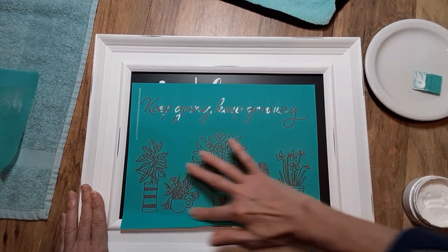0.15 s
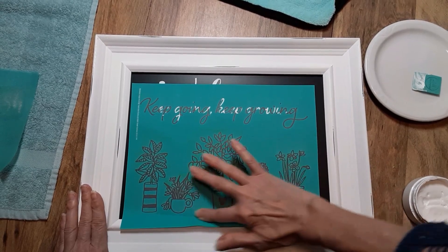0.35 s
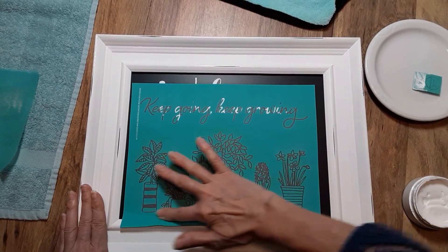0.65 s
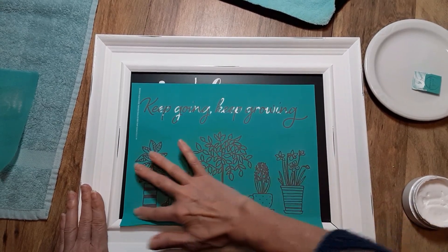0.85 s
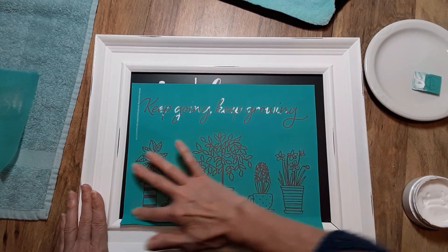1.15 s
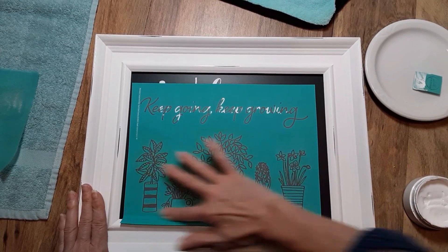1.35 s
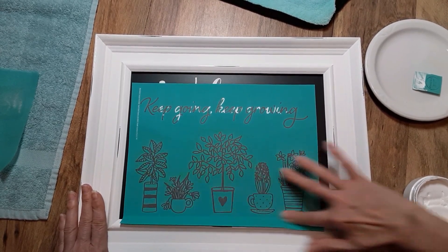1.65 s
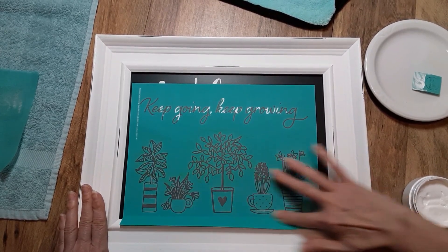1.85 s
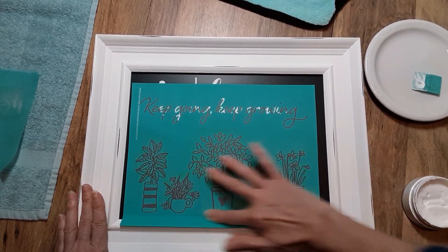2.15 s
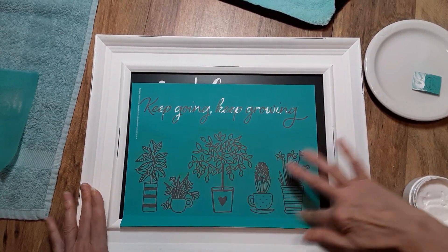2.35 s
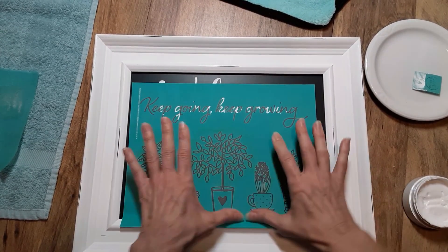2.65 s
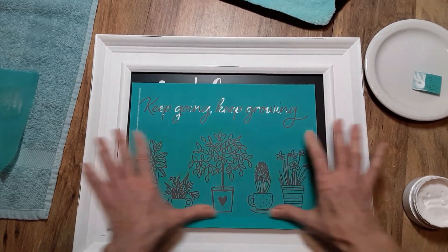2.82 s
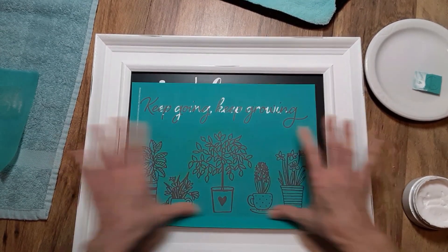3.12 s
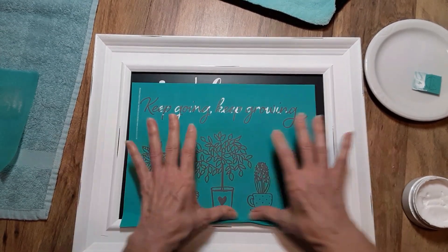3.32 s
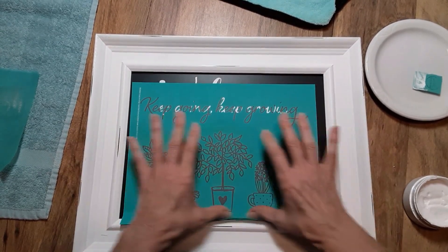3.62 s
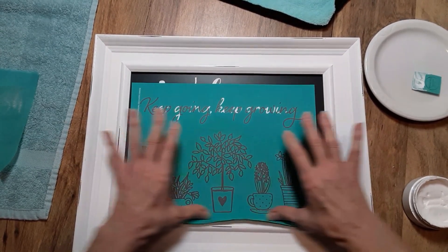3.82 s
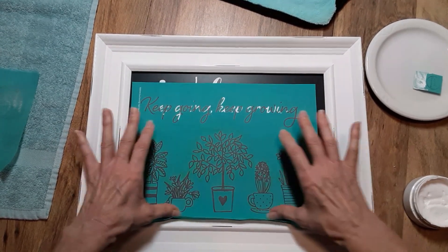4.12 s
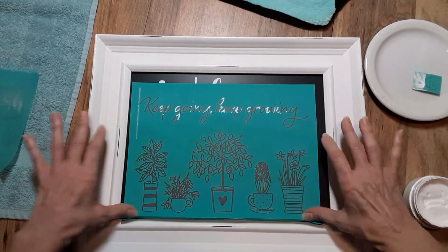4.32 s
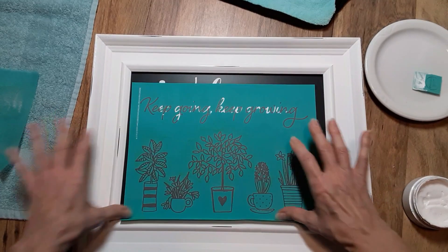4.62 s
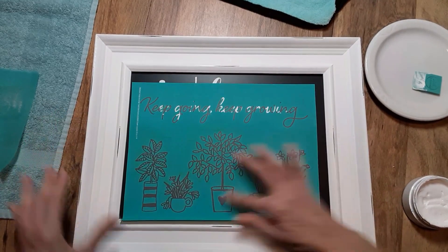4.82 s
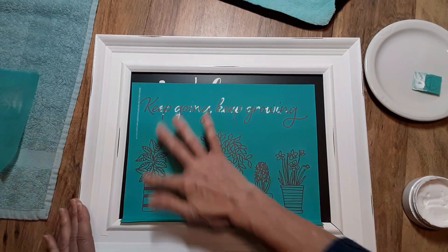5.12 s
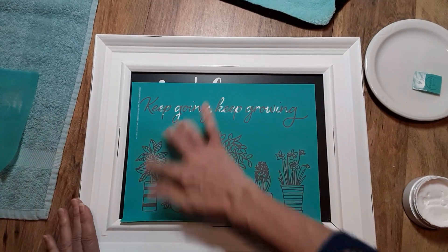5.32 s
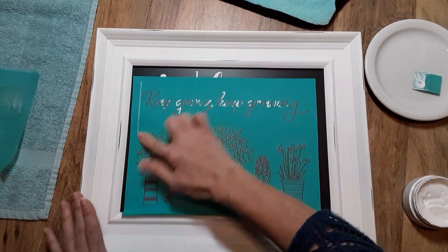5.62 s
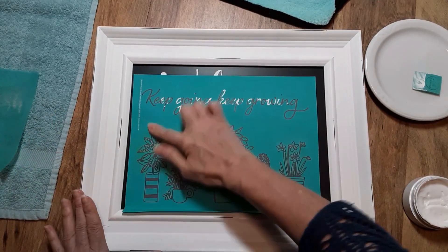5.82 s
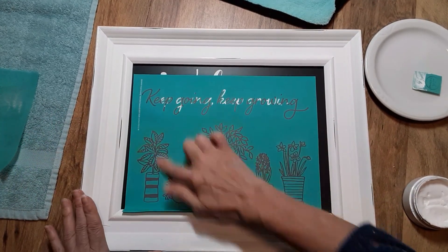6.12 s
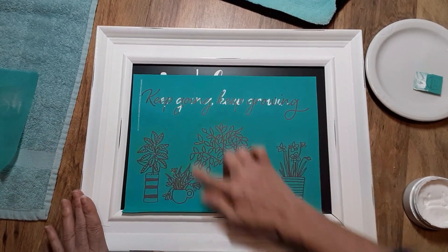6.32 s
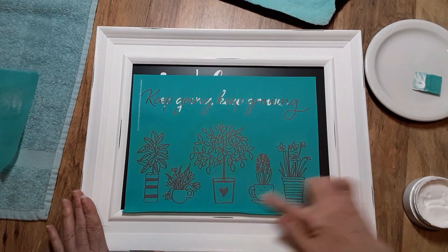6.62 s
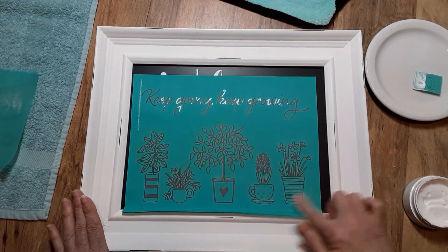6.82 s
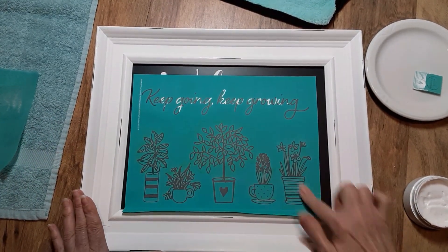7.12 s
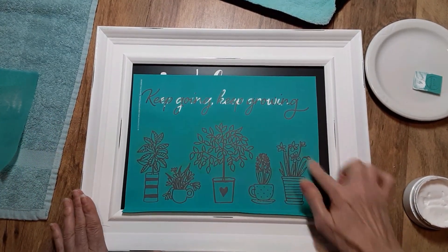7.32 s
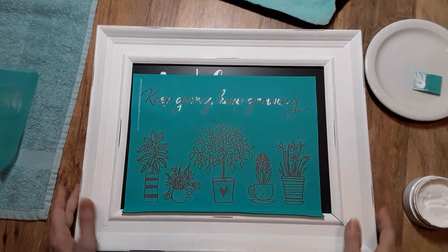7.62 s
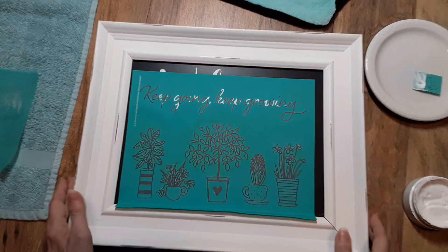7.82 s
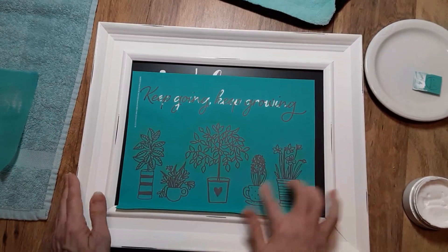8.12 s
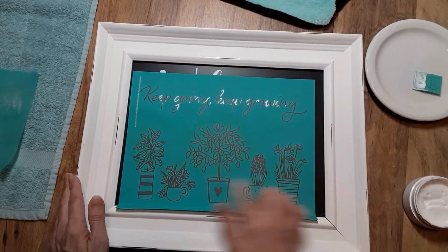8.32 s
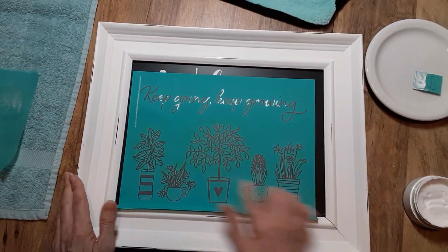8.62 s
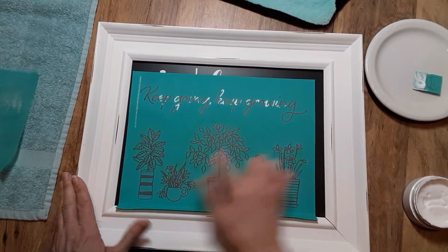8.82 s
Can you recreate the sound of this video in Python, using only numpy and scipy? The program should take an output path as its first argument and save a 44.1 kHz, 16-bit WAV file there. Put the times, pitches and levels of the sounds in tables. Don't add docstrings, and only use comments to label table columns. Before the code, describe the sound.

Dry palm swipes, then quick finger scrubs over film on a hollow board, with thuds and a loud snap in a quiet room.

```python
import sys
import numpy as np
from scipy import signal
from scipy.io import wavfile
from scipy.ndimage import uniform_filter1d

SR = 44100
rng = np.random.default_rng(int(sys.argv[2]) if len(sys.argv) > 2 else 0)


def boost(x):
    u = np.asarray(x, float) / 20
    return 10 ** u


def master(y):
    cut = np.clip(np.atleast_2d(y).T, -1, 1)
    pcm = np.round(cut * 32767)
    wavfile.write(sys.argv[1], SR, pcm.astype(np.int16))


N = 395119

# pitch_hz, width_hz, rubbed_db, knocked_db
BOARD_MODES = [(97.5, 74, -9, -17.5), (167, 13.5, 7.5, -12), (272, 20, -2.5, -6.5), (307, 60, 0.5, -1),
               (412, 56, 2, 6), (481, 93, -4, 6.5), (550, 88, -7, -3), (616.4, 61, -3, -2.5),
               (760, 29.6, -3.5, -7), (818, 17, 1.5, -25), (929, 43, -4, -10), (1061, 49, -1.5, -10)]
# pitch_hz, width_hz, level_db
EDGE_MODES = [(1108, 250, -3.5), (1319, 128, -6), (1658, 87, -3.5), (1800, 110, 0), (2076, 120, -7),
              (2550, 250, -12.5)]
# time_s, edge_above_hiss_db, dullness_db, slip_pitch_hz
HAND_GRIP = [(0, -9.5, 6.5, 624), (.7, -9, 5, 556), (1.2, -6, 5.5, 616), (1.6, -2.5, 4.5, 780),
             (2.0, -10, 6.5, 630), (2.4, -6, 6, 670), (2.8, -9, 8, 669), (3.3, -10, 7.5, 776),
             (3.9, -5, 6.5, 734), (4.6, -9, 6.5, 573), (4.8, -35, 10, 434), (5.1, -5, 3.5, 506),
             (5.6, 1, 9.5, 486), (6.3, -2, 4, 550), (6.9, 4.5, 7, 464), (7.2, -4.5, 1, 606),
             (8.2, -7, 6, 515), (8.96, 3, 5, 594)]


def evened(x):
    return x / np.sqrt(np.mean(x ** 2) + 1e-20)


def read(points, hz):
    f, value = np.transpose(points)
    return np.interp(np.log(hz + 1), np.log(f + 1), value)


def curve(table, t):
    s, *columns = np.transpose(table)
    return [np.interp(t, s, column) for column in columns]


def ring(x, hz, width):
    pole = np.exp((2j * np.pi * hz - np.pi * width) / SR)
    return 2 * signal.lfilter([1 - abs(pole)], [1, -pole], x).real


def drift(samples):
    smooth = uniform_filter1d(rng.standard_normal(N), samples)
    return evened(uniform_filter1d(smooth, samples))


def shaped(x, rule, size=256):
    overlap = size * 3 // 4
    hz, s, z = signal.stft(x, SR, nperseg=size, noverlap=overlap)
    y = signal.istft(rule(z, hz[:, None], s), SR, nperseg=size, noverlap=overlap)[1]
    return y[..., :x.shape[-1]]


def blend(z, hz):
    # pitch_hz, likeness_0_to_1
    likeness = [(30, 0.65), (130, 0.89), (300, 0.81), (640, 0.64), (1400, 0.028), (3000, 0.07)]
    same = np.clip(read(likeness, hz), 0, 1)
    return np.array([z[0], same * z[0] + np.sqrt(1 - same ** 2) * z[1]])


def air():
    # pitch_hz, level_db per Hz
    hush_colour = [(15, -60), (25, -50), (64, -13), (97, -29), (105, -14), (145, -6), (242, -13.5),
                   (335, -5), (394, -15.5), (476, -8.5), (531, -15.5), (962, -17.5), (1160, -20),
                   (1560, -35), (16000, -43.5)]
    # pitch_hz, waver_hz, level_db
    drone_tones = [(118.8, 0.42, -64), (154, 3.4, -63.5), (271.7, 12, -71.5)]

    def colour(z, hz, s):
        return blend(z, hz) * boost(read(hush_colour, hz))

    hush = shaped(rng.standard_normal((2, N)), colour, size=2048)
    t = np.arange(N) / SR
    drone = np.zeros(N)
    for hz, waver_hz, db in drone_tones:
        waver = waver_hz * np.cumsum(drift(7650)) / SR
        drone += boost(db) * np.sin(2 * np.pi * (hz * t + waver))
    return boost(-58.5) * evened(hush) + drone


def strokes(t):
    # start_s, length_s, hiss_db, top_speed_place_0_to_1, board_load_db; the faint one at 7.63 s is
    palm_strokes = [(0.0, .24, -49.5, 0.6, -46.5), (0.21, 0.16, -59, 0.64, -62.5),
                    (0.365, 0.24, -48.5, 0.51, -46), (0.604, 0.13, -56.5, 0.53, -63.5),
                    (0.734, 0.17, -52, 0.61, -49.5), (0.927, 0.15, -55.5, 0.46, -62),
                    (1.069, 0.17, -54.5, 0.56, -51), (1.243, 0.5, -48, 0.25, -59),
                    (1.446, 0.36, -48, 0.36, -56), (1.751, 0.38, -45.5, 0.59, -49.5),
                    (2.098, 0.24, -48.5, 0.58, -55.5), (2.245, 0.16, -45, 0.58, -63)]
    two_hand_strokes = [(2.67, 0.42, -49.5, 0.45, -47.0), (3.028, 0.34, -44, 0.45, -46),
                        (3.286, 0.23, -53, 0.48, -49.5), (3.5, 0.24, -51.5, 0.45, -44.5),
                        (3.685, 0.38, -53.5, 0.48, -49.5), (3.997, 0.14, -58.5, 0.56, -50.5),
                        (4.132, 0.24, -52, 0.57, -48), (4.35, 0.24, -60.5, 0.67, -52.5),
                        (4.568, 0.16, -62.5, 0.2, -58.5)]
    finger_strokes = [(4.766, 0.077, -41, 0.51, -55.5), (4.806, 0.23, -48, 0.67, -51.5),
                      (5.032, 0.16, -52, 0.56, -53.0), (5.213, 0.066, -55.5, 0.26, -59.0),
                      (5.292, 0.12, -50.5, 0.37, -59.5), (5.417, 0.087, -50.5, 0.43, -62.5),
                      (5.514, 0.15, -55, 0.34, -59), (5.649, 0.077, -52, 0.34, -59.5),
                      (5.753, 0.096, -52.5, 0.23, -58.5), (5.857, 0.082, -49.5, 0.6, -58.5),
                      (5.965, 0.095, -51.5, 0.36, -57.5), (6.066, 0.1, -51, 0.57, -57.5),
                      (6.174, 0.11, -53, 0.47, -56.5), (6.259, 0.16, -52.5, 0.57, -61.5),
                      (7.63, 0.21, -80, 0.47, -74), (6.374, 0.189, -58, 0.29, -57),
                    (6.464, 0.34, -55, 0.48, -64), (6.819, 0.1, -56, 0.24, -75),
                    (6.894, 0.15, -56.5, 0.6, -71), (7.023, 0.25, -57.5, 0.8, -54.0),
                    (7.248, 0.17, -69, 0.53, -62), (7.442, 0.053, -74.5, 0.08, -62),
                    (8.123, 0.11, -56, 0.54, -62), (8.249, 0.19, -49.5, 0.4, -60),
                    (8.434, 0.14, -55, 0.57, -58.5), (8.596, 0.2, -50.5, 0.43, -57.5),
                    (8.794, 0.14, -49.5, 0.17, -55.5), (8.88, 0.17, -55, 1, -49.5)]
    speed_bend, load_bend = 2.055, 0.92
    catch, catch_s, catch_db = 0.14, 0.0066, -11.5
    hiss = boost(2 * -97) + 0 * t
    load = hiss.copy()
    press, total = 0 * t, 1e-6 + 0 * t
    for s, length, hiss_db, top, load_db in palm_strokes + two_hand_strokes + finger_strokes:
        top = np.clip(top, .03, .97)
        speed = np.sin(np.pi / 2 * np.interp(t, [s, s + top * length, s + length], [0, 1, 0]))
        light_db = catch_db * np.clip((s + catch * length - t) / catch_s, 0, 1)
        hiss = hiss + (boost(hiss_db) * speed ** speed_bend) ** 2
        load = load + (boost(load_db + light_db) * speed ** load_bend) ** 2
        press = press + speed * (load_db - hiss_db)
        total = total + speed
    return 10 * np.log10(hiss), 10 * np.log10(load), press / total


def controls():
    t, coarse = np.arange(N) / SR, np.arange(0, N + 128, 64) / SR
    hiss_db, load_db, press_db = (np.interp(t, coarse, c) for c in strokes(coarse))
    edge_db, _, slip_hz = curve(HAND_GRIP, t)
    return hiss_db, load_db, hiss_db + edge_db + 0.58 * press_db, slip_hz


def slips(grain_db, judder_db):
    grain = np.minimum(rng.exponential(1, N), 5)
    size = boost(grain_db * grain + judder_db * drift(140))
    return evened(size * rng.standard_normal(N))


def skin_hiss():
    # pitch_hz, level_db per Hz
    skin_colour = [(710, -26.5), (1200, -13), (1620, -11.5), (1910, -8.5), (2470, -13.5), (2690, -12.5),
                   (3230, -9), (4910, -7.5), (5710, -6), (12300, 4), (15700, -0.5)]
    # pitch_hz, share_of_dullness
    dull_tilt = [(1000, 1), (4000, 0.63), (7000, 0.57), (10000, -0.22), (16000, -1)]
    speed = boost(controls()[0])
    patches = uniform_filter1d(rng.standard_normal((129, N // 64 + 9)), size=6, axis=0)
    patches = evened(uniform_filter1d(patches, size=40, axis=1))

    def colour(z, hz, s):
        hiss_db, _, press_db = strokes(s)
        dull_db = curve(HAND_GRIP, s)[1] + 0.28 * press_db - 0.13 * np.maximum(hiss_db + 49.5, -12)
        return z * boost(read(skin_colour, hz) + read(dull_tilt, hz) * dull_db + 2.0 * patches[:, :len(s)])

    def treble(z, hz, s):
        return z * boost(read(skin_colour, hz)) * (hz > 5000)

    unit = np.std(shaped(rng.standard_normal(SR), treble))
    contacts = []
    for _ in range(3):
        contacts.append(speed * shaped(slips(grain_db=1.0, judder_db=2.37), colour) / unit)
    return contacts[0], np.array(contacts[1:])


def board_rub():
    _, low_db, high_db, slip_hz = controls()
    drive = slips(grain_db=1.5, judder_db=4.5)
    low, high = np.zeros(N), np.zeros(N)
    for hz, width, db, _ in BOARD_MODES:
        octaves = np.log2(hz / slip_hz)
        level = boost(db + 2.8 * drift(2600) - 20 * octaves ** 2)
        low += level * ring(ring(drive, hz, 1.31 * width), hz, 1.31 * width)
    for hz, width, db in EDGE_MODES:
        level = boost(db + 3.5 * drift(1500))
        high += level * ring(ring(drive, hz, 1.6 * width), hz, 1.6 * width)
    return boost(low_db - 2.0) * evened(low) + boost(high_db) * evened(high)


def thuds():
    # start_s,
    # peak_db, contact_ms, room_share_db, chatter_db
    knocks = [(0.047, -48, 0.82, 10, -23), (0.759, -31, 1.0, -4, -6), (1.103, -46, 1.0, 0, -10),
              (1.428, -30, 0.54, -1.5, -25), (2.4, -28.5, 1.0, -1.5, -4), (2.702, -16, 0.67, -4, -11),
              (3.244, -31, 0.88, -8, -7), (3.637, -34.5, 0.34, -9, -17), (4.809, -36, 1.0, -11, -3.5),
              (5.083, -39.5, 0.61, 3, -7), (6.371, -27.5, 0.66, 0.5, -24), (7.367, -32.5, 0.94, -3, -10),
              (7.616, -20, 0.38, 2, -35), (7.689, -33, 0.33, 0.5, -9), (7.846, -32, 1, -2, -17.5),
              (8.177, -36.5, 1.0, -7, -8.5)]
    dry, wet, t = np.zeros(N), np.zeros(N), np.arange(8000) / SR
    for s, db, contact_ms, wet_db, chatter_db in knocks:
        push = np.sin(np.pi * np.clip(t / (contact_ms / 1000), 0, 1)) ** 2
        chatter = rng.standard_normal(len(t))
        bounces = chatter * (abs(chatter) > 2.6) * boost(chatter_db - 60 * t / 0.19) / 3
        push += signal.fftconvolve(push, bounces)[:len(t)]
        body = np.zeros(len(t))
        for k, (hz, width, _, mode_db) in enumerate(BOARD_MODES):
            spot_db = 2.5 * rng.standard_normal()
            body += boost(mode_db + spot_db) * (-1) ** k * ring(push, hz, 1.08 * width) / width
        for hz, width, mode_db in EDGE_MODES:
            body += boost(mode_db - 19.0) * ring(push, hz, 3.7 * width) / width
        body /= abs(body).max()
        at = round(s * SR)
        dry[at:at + len(t)] += boost(db) * body
        wet[at:at + len(t)] += boost(db + wet_db) * body
    return dry, wet


def snaps():
    # start_s, peak_db, left_minus_right_db, brightness_db
    clicks = [(2.1894, -38, -6, 0), (2.1994, -37, -2, 0), (2.2094, -36, -2, 0), (2.7477, -32, -1, 0),
              (2.8562, -26, -2, 0), (5.308, -37, -6, 6), (3.2447, -1, 0, 3), (3.6388, -11.5, 1, -2),
              (7.614, -46, 0, 3), (7.79, -58, 0, 9), (7.956, -62, 0, 9), (8.009, -60, 0, 9)]
    # pitch_hz, width_hz, level_db
    snap_modes = [(830, 130, -8), (1840, 500, -4), (2450, 480, 0), (3600, 930, -5), (6200, 800, -4),
                  (7800, 450, -1), (11500, 1800, -7), (14500, 1800, -11)]
    out, click = np.zeros((2, N)), np.zeros(1500)
    click[[0, 31, 55, 88, 140]] = [1, 0.14, -0.035, 0.024, -0.12]
    fade = boost(-3 - 60 * np.arange(1500) / SR / .003)
    for s, db, pan_db, bright_db in clicks:
        for ear, late in enumerate([0, 3]):
            splutter = rng.standard_normal(1500) * fade
            shape = np.zeros(1500)
            for k, (hz, width, mode_db) in enumerate(snap_modes):
                high = hz > 5000
                sound = ring(click + high * splutter / 3, hz, width) / np.sqrt(width)
                shape += boost(mode_db + bright_db * high) * (-1) ** k * sound
            at = round(s * SR) + late
            level = boost(db + pan_db * (1 - 2 * ear) / 2)
            out[ear, at:at + len(shape)] += level * shape / abs(shape).max()
    return out


def drags():
    # start_s, length_s, level_db, brightness_hz
    scrapes = [(2.374, 0.031, -48.5, 2540), (2.694, 0.11, -45, 2330), (4.83, 0.16, -46.5, 3400),
               (7.599, 0.2, -56, 3770), (7.848, 0.062, -65, 1970)]
    out, grit = np.zeros(N), slips(grain_db=3.5, judder_db=4.5)
    for s, length, db, hz in scrapes:
        at, u = round(s * SR), np.linspace(0, 1, round(length * SR))
        band = signal.butter(2, [200, hz], "band", fs=SR, output="sos")
        scrape = evened(signal.sosfilt(band, grit[at:at + len(u)]))
        out[at:at + len(u)] += boost(db) * (1 - u) * np.minimum(12 * u, 1) * scrape
    return out


def squeaks():
    # start_s, length_s, level_db, pitch_hz
    chirps = [(7.202, 0.036, -51, 1800), (8.638, 0.031, -52, 1736)]
    out, noise = np.zeros(N), rng.standard_normal(N)
    for s, length, db, hz in chirps:
        at, swell = round(s * SR), np.hanning(round(length * SR))
        tone = ring(noise, hz, 34.7)[at:at + len(swell)]
        out[at:at + len(swell)] += boost(db) * swell * evened(tone)
    return out


def placed(x):
    # time_s, left_lead_samples
    hand_place = [(0, 2), (.55, -1), (.75, 3), (1.3, -2), (1.75, 5), (2.05, 0), (2.35, 5), (2.8, 2),
                  (4.2, 2), (4.7, 5), (4.9, 9), (5.02, -2), (6.1, -2), (6.9, 8), (7.2, 5), (8.2, 5),
                  (8.7, 0), (8.96, 1)]
    side = np.array([1, -1])[:, None, None]

    def shift(z, hz, s):
        lead = curve(hand_place, s)[0]
        return z * np.exp(1j * np.pi * side * hz * lead / SR)

    return shaped(x, shift)


def room(x):
    # pitch_hz, time_to_fall_60_db_s
    echo_times = [(150, 0.37), (500, 0.12), (2000, 0.35), (6000, 0.21), (15000, 0.046)]
    taps = np.zeros((2, SR // 2))
    at = np.arange(140, SR // 2 - 20, 20)
    at = at + rng.integers(0, 20, (2, len(at)))
    np.put_along_axis(taps, at, rng.choice([-1., 1.], at.shape), axis=1)

    def fade(z, hz, s):
        return blend(z, hz) * boost(-60 * s / read(echo_times, hz))

    tail = shaped(taps, fade)
    return signal.fftconvolve(x[None], tail / np.linalg.norm(tail[0]), axes=1)[:, :N]


def scene():
    hush = air()
    hiss, spread = skin_hiss()
    rub = board_rub()
    knocks, wet_knocks = thuds()
    clicks = snaps()
    rub = rub + drags() + squeaks()
    direct = placed(boost(-3.5) * hiss + rub + knocks) + boost(7.0) * spread + clicks
    sent = boost(1.0) * hiss + boost(-3.0) * rub + boost(-4.5) * wet_knocks + boost(-9.0) * clicks.mean(0)
    return direct + room(sent) + hush


def band_limit(x):
    return signal.sosfilt(signal.butter(12, 16970, fs=SR, output="sos"), x)


def record(dry):
    bass_cut = signal.butter(2, 55, "high", fs=SR, output="sos")
    thin = signal.sosfilt(bass_cut, dry) * boost(np.array([[-.3], [.3]]))
    treble_cut = signal.firwin(401, 15900, window=("kaiser", 9), fs=SR)
    mix = signal.oaconvolve(thin, treble_cut[None], "same")
    return band_limit(mix)


dry = scene()
out = record(dry)
master(out)
```